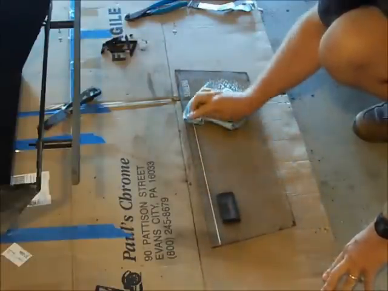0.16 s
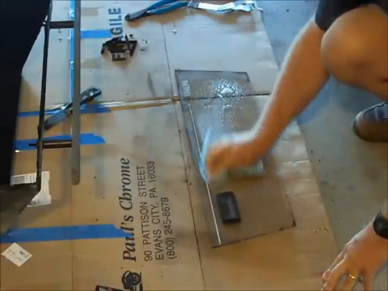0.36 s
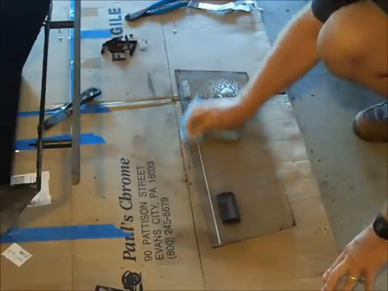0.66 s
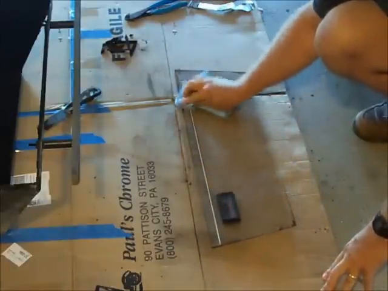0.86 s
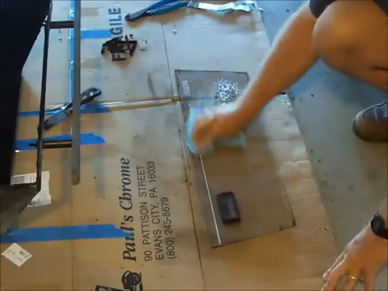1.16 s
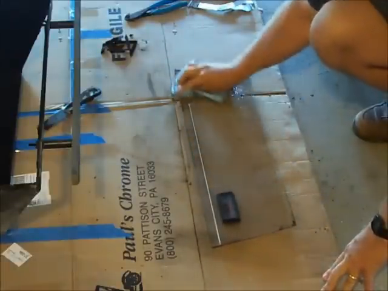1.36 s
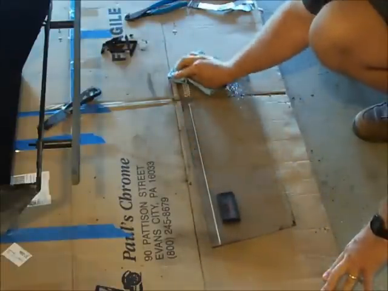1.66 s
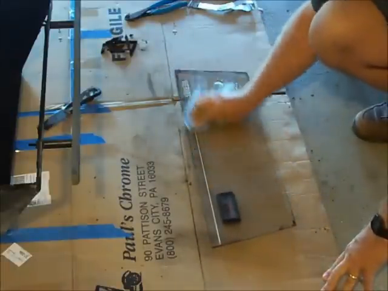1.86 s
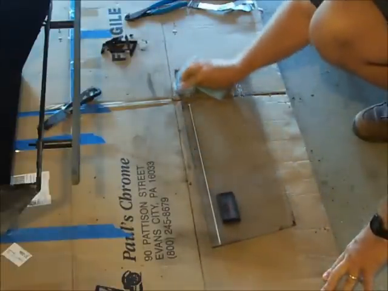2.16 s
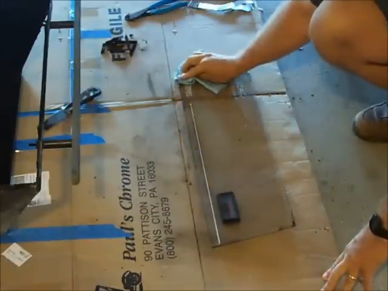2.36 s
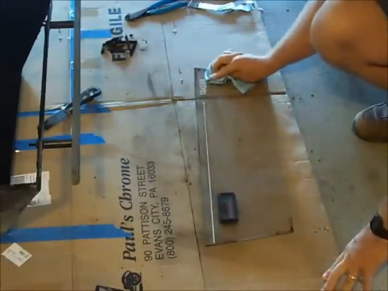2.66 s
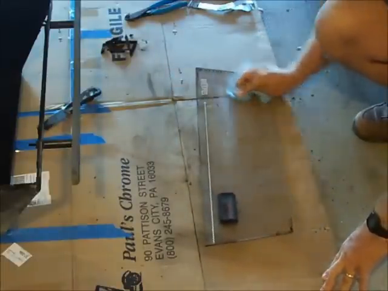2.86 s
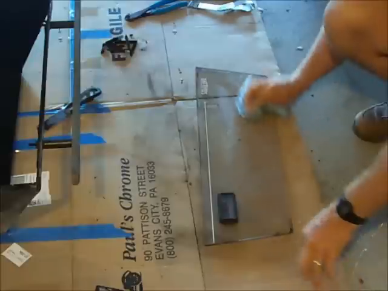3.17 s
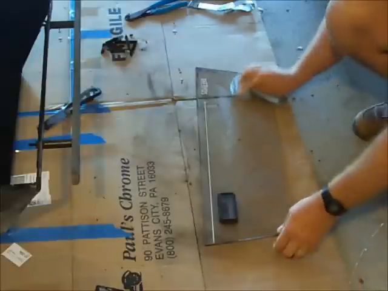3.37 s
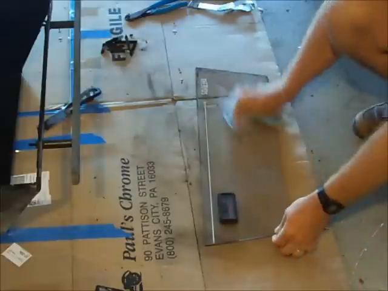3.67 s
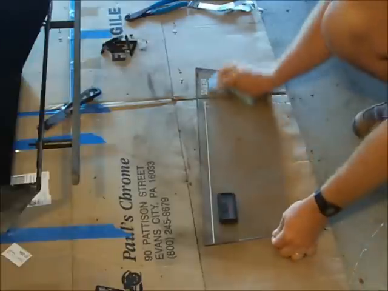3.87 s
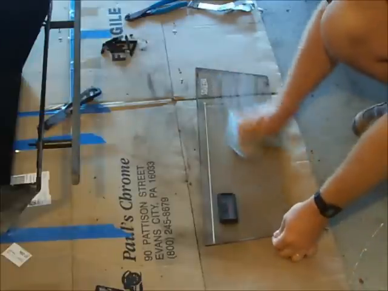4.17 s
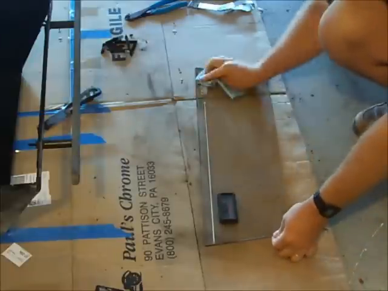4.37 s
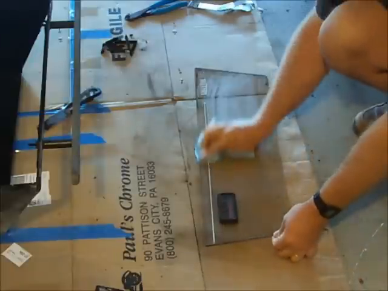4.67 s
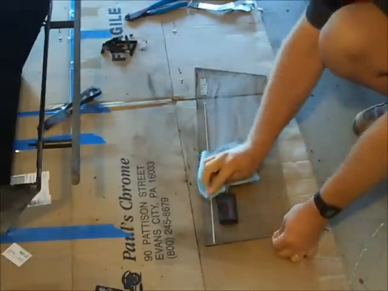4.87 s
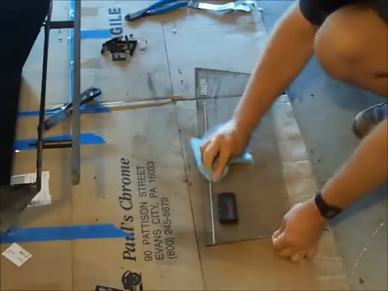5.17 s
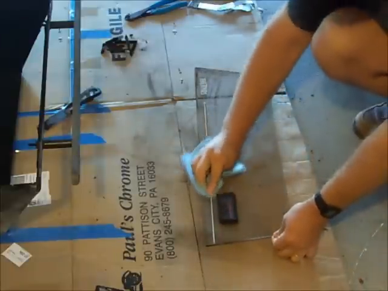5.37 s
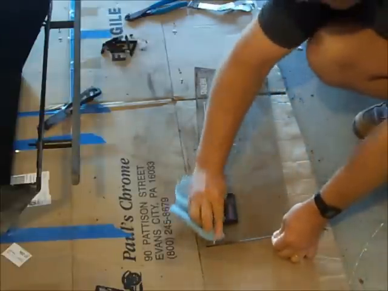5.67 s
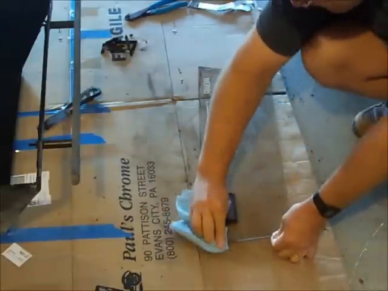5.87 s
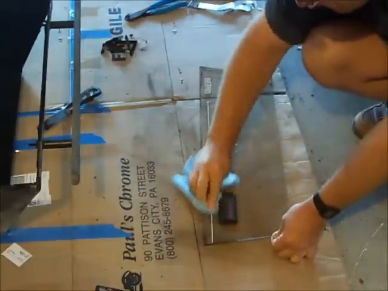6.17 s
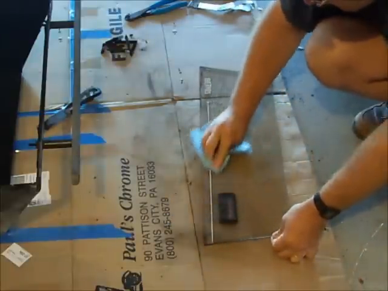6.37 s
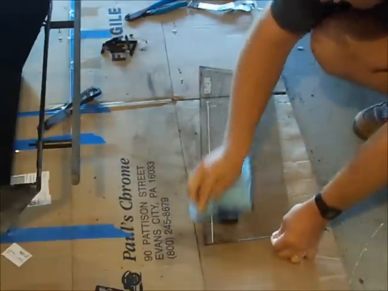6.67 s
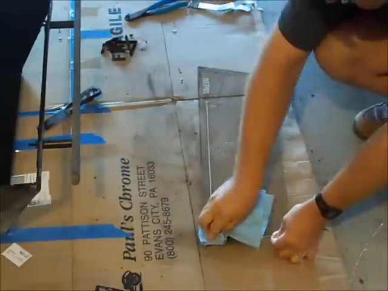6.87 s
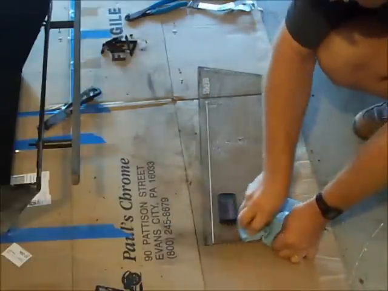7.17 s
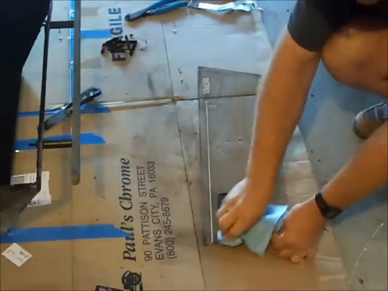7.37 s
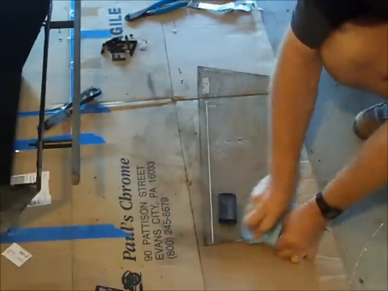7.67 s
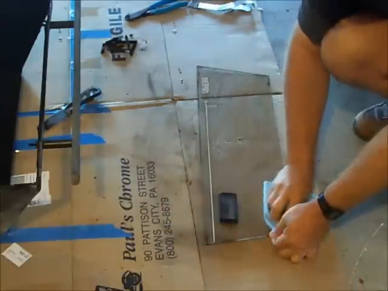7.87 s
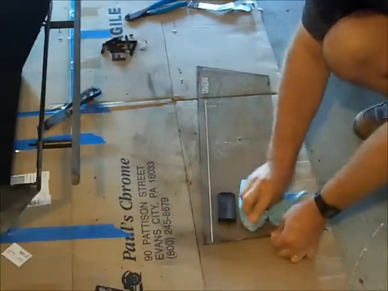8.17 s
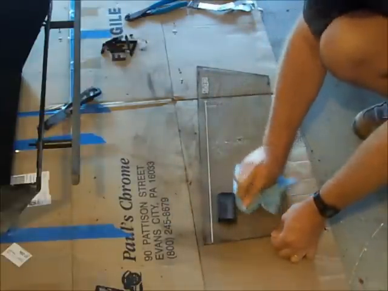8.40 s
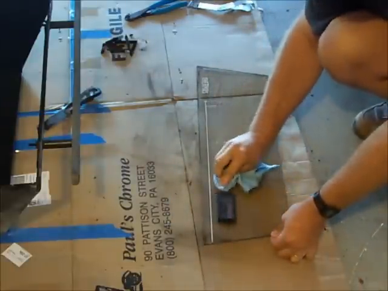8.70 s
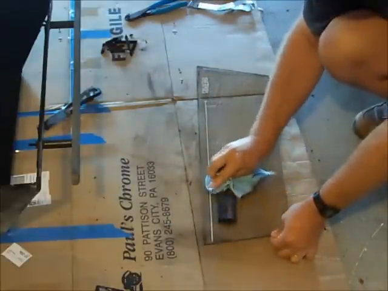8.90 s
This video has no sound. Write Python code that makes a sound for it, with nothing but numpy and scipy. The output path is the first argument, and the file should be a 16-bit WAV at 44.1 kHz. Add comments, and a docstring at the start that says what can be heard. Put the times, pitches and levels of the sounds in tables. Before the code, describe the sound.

A cloth rubs a glass panel in short uneven strokes while the panel knocks on the floor, over faint hum in a hard garage.

```python
"""From the start a low hum and a far engine drone under the air of a garage: tones and filtered noise.
At once a cloth wipes a glass panel on cardboard in short uneven strokes: noise shaped by hand speed.
The panel soon rocks and knocks, late on with one sharp ringing clack: noise bursts, ring and echo.
Past halfway, drier patches squeak (narrow noise bands) and shifting weight swells dully (low noise).
The hard room answers wipes, knocks and squeaks with dense, decaying noise."""
import sys
import numpy as np
from scipy import signal
from scipy.fft import rfft, irfft, next_fast_len
from scipy.io import wavfile
from scipy.ndimage import uniform_filter1d

SR = 44100
rng = np.random.default_rng(int(sys.argv[2]) if len(sys.argv) > 2 else 0)


def master(y):
    """Save y as 16-bit WAV."""
    cut = np.clip(np.atleast_2d(y).T, -1, 1)
    pcm = np.round(cut * 32767)  # scale
    wavfile.write(sys.argv[1], SR, pcm.astype(np.int16))


N = 398663
TIME = np.arange(N) / SR

# Balance of the garage air: f/Hz, relative level per Hz/dB
AIR_SPECTRUM = [(12, 3), (22, -12), (38, -8), (62, -16), (85, -9), (115, -15), (160, -18), (300, -20.5),
                (765, -28), (1290, -30.5), (1830, -41), (3500, -23.5), (4730, -33.5), (6710, -35.5),
                (7230, -42.5), (7790, -60.5), (9000, -66)]
# Level of the hum's main tone: t/s, level/dB
HUM_CURVE = [(0, -67), (4.8, -67), (5.2, -60), (6, -67), (6.6, -68), (6.9, -62), (7.45, -60), (7.65, -52),
             (7.9, -49), (8.2, -50), (8.5, -51), (8.7, -60), (9.04, -55)]
# A far engine pulls, then drops back: t/s, firing rate f/Hz, level/dB before a 1 dB lift
ENGINE_CURVE = [(0, 109, -58), (.3, 103, -60), (1.7, 105, -60), (2.8, 109, -60), (3.8, 115, -61),
                (4.6, 117, -62), (4.95, 98, -67), (6.5, 97, -65), (7.4, 97.5, -63), (7.85, 96.5, -55),
                (8.3, 96, -61), (9.04, 95, -70)]
# Reverberation of the garage: f/Hz, time to fall 60 dB/s
GARAGE_DECAY = [(300, 0.94), (1000, 0.93), (2800, 0.88), (5000, 0.78), (7500, 0.77)]
# Strokes of the cloth: start t/s, speeding up/s, slowing down/s, friction level/dB,
# dark rustle against friction/dB, fine hiss against friction/dB
WIPE_STROKES = [(0.0, 0.0045, 0.11, -55.5, -13, -15), (0.19, .04, .12, -68, -21, -5),
                (0.62, 0.036, .08, -58, -15, -7.5), (0.78, 0.16, 0.082, -50.5, -15, -8.5),
                (1.05, 0.11, 0.12, -49, -16.5, -10), (1.4, 0.078, 0.42, -52.5, -14.5, -12),
                (1.79, 0.14, 0.16, -48, -11, -10.5), (2.26, .1, 0.11, -58, -11, -11),
                (2.48, 0.049, 0.12, -53, -2, -15), (2.51, 0.093, 0.3, -49, -9, -14),
                (2.879, 0.033, 0.65, -55.5, -10.5, -13), (3.17, .11, 0.24, -55.5, -5, -9),
                (3.439, 0.14, 0.16, -49, -3.5, -11.5), (3.83, .1, 0.15, -58, -6.5, -13),
                (4.23, 0.026, 0.081, -57.5, -3, -15), (4.58, 0.17, 0.56, -52, -19.5, -10.5),
                (5.0, .03, 0.083, -53, -13, -12), (5.152, 0.018, 0.095, -44.5, -12.5, -14.5),
                (5.33, 0.13, 0.18, -60.5, -16, -8), (5.513, 0.03, 0.48, -42.5, -17.5, -11.5),
                (5.94, 0.11, 0.33, -52.5, -7.5, -14), (6.159, .14, 0.3, -42, -15, -13.5),
                (6.37, 0.084, 0.23, -48.5, -7.5, -18), (6.89, 0.078, 0.087, -53, -6.5, -16.5),
                (7.05, 0.067, 0.16, -55, -15, -12), (7.16, 0.077, 0.6, -55.5, -6, -13),
                (7.69, 0.04, 0.72, -49.5, -7.5, -14), (8.05, 0.095, 0.23, -51.5, -7, -17),
                (8.355, 0.027, 0.066, -54, -8.5, -11), (8.458, 0.019, 0.1, -47, -13.5, -8.5),
                (8.55, .058, .1, -42.5, -13.5, -11), (8.69, 0.1, 0.13, -48.5, -9, -10)]
# The cloth creeps on between strokes: friction, dark rustle, fine hiss level/dB
CREEP_LEVELS = (-66.5, -69.5, -76.5)
# Balance of cloth on glass: f/Hz, relative level per Hz/dB
CLOTH_SPECTRUM = [(200, -32), (400, -19), (800, -17), (1300, -14), (1800, -13.5), (2400, -9), (3000, -5),
                  (3500, -2), (3950, -4.5), (4500, -8), (5300, -10), (6000, -13), (6800, -15), (7400, -23),
                  (7800, -42)]
# Knocks of the panel: t/s, overall level/dB, treble tilt/dB and bass tilt/dB (-19 is neutral),
# contact pitch f/Hz, hollow panel note f/Hz, trim of the room tail/dB
PANEL_KNOCKS = [(0.337, -22.5, -29.5, -18, 3170, 1610, -10.5), (0.576, -42.5, -7, -28, 2510, 1280, -18),
                (0.991, -29.5, -23, -19.5, 2400, 1620, -3), (2.124, -38, -16, -25, 3100, 1600, -3),
                (3.444, -32.5, -22, -10, 1180, 870, -7), (3.459, -26, -27, -11, 2430, 1280, -3.5),
                (3.963, -24.5, -23, -19, 2400, 1580, -7), (4.499, -27, -20.5, -17.5, 3080, 1280, -5.5),
                (5.021, -44, -14, -14, 3300, 1280, 2.5), (6.016, -27.5, -16, -15, 3700, 1600, -13.5),
                (7.385, -36.5, -31, -23, 2910, 1600, -0.5), (7.454, -11.5, -15.5, -18.5, 2320, 1210, -4),
                (7.983, -38, -40, -12, 3300, 1280, 4), (8.067, -27, -16, -17, 2390, 1170, 0)]
# Basic balance of a knock: f/Hz, relative level per Hz/dB
KNOCK_SPECTRUM = [(150, -35), (300, -22), (500, -23.5), (750, -14), (1150, -9), (1700, -8.5), (2400, -7),
                  (3100, -5), (3900, -4.5), (4800, -13.5), (5400, -11), (6500, -15), (7300, -16),
                  (7800, -45.5)]
# Clusters of panel modes: f/Hz, width/Hz, relative level/dB
GLASS_MODES = [(485, 50, -13), (660, 50, -13), (872, 40, -9), (1135, 50, -7), (1285, 80, -4),
               (1600, 90, -7), (1975, 110, -4), (2250, 80, -3), (2385, 90, -2), (2468, 70, -4),
               (3150, 110, -4), (3500, 100, -6), (3920, 110, -6), (4460, 80, -8), (5060, 60, -12),
               (5185, 60, -10), (5420, 100, -5)]
# The cloth grips and chatters: t/s, length/s, level/dB, pitch f/Hz, whistle width/Hz,
# broad rasp against the whistle/dB
CLOTH_SQUEAKS = [(5.157, 0.074, -46.7, 5630, 200, -3), (7.203, 0.17, -60.5, 5570, 150, -2),
                 (8.054, 0.034, -47, 5330, 70, -6), (8.366, 0.045, -62.5, 5500, 100, -12),
                 (8.602, 0.087, -50.5, 5320, 70, -9), (8.742, 0.14, -51, 5470, 65, -20)]
# Resonances stirred by a squeak: f/Hz, width/Hz, level against the whistle/dB
SQUEAK_RESONANCES = [(1250, 100, -23.5), (3480, 160, -11), (5260, 100, -3), (5830, 120, -8.5),
                     (6000, 100, -9)]
# Dull swells as weight shifts on the cardboard: t/s, length/s, deep rumble level/dB, low rustle level/dB
WEIGHT_SHIFTS = [(5.62, 0.59, -55, -62.5), (7.498, 0.68, -50.5, -58), (8.383, 0.3, -46, -59.5)]


def gain_of(db):
    """Turns decibels into amplitude."""
    return 10 ** (np.asarray(db) / 20)


def evened(x):
    """Scales a sound to rms 1."""
    return x / np.sqrt(np.mean(x ** 2) + 1e-20)


def read(points, hz):
    """Reads a table on a log-frequency axis."""
    f, value = np.transpose(points)
    return np.interp(np.log(hz + 1), np.log(f + 1), value)


def follow(rows):
    """Draws the columns of a time curve at every sample, smoothed over 10 ms."""
    t, *columns = np.transpose(rows)
    return [uniform_filter1d(np.interp(TIME, t, column), size=SR // 100) for column in columns]


def add(mix, t, sound):
    """Mixes a sound in at time t, in seconds."""
    part = mix[max(round(t * SR), 0):][:len(sound)]
    part += sound[:len(part)]


def shaped(x, gain):
    """Filters a sound by a gain that is a function of Hz."""
    size = next_fast_len(len(x))
    spectrum = rfft(x, size)
    return irfft(spectrum * gain(np.fft.rfftfreq(size, 1 / SR)), size)[:len(x)]


def noise(gain, count=N):
    """White noise coloured by a gain that is a function of Hz, rms 1."""
    return evened(shaped(rng.standard_normal(count), gain))


def band(hz, width_hz, count=N):
    """Noise in a single resonance with steep skirts, rms 1."""
    return noise(lambda f: 1 / (1 + (2 * (f - hz) / width_hz) ** 2), count)


def drift(rate_hz, count=N):
    """Slow chance movement up to a given rate, rms 1."""
    return noise(lambda f: 1 / (1 + (f / rate_hz) ** 4), count)


def humming():
    """A wavering tone near 60 Hz, dull noisy overtones that follow it, and a steady boom of the room."""
    level_db, = follow(HUM_CURVE)
    tone = evened(np.sin(2 * np.pi * 60.3 * TIME + 0.7 * drift(2.5)))
    overtones = evened(band(178, 13) + band(220, 200))
    boom = gain_of(-59) * band(62, 13)
    return gain_of(level_db) * (tone + gain_of(-14) * overtones) + boom


def engine():
    """A far engine through the walls: an unsteady sine at its firing rate and a narrow murmur."""
    firing_hz, level_db = follow(ENGINE_CURVE)
    tone = np.sin(2 * np.pi * np.cumsum(firing_hz) / SR)
    unsteadiness = 1 + 0.061 * drift(4.4)
    drone = tone * unsteadiness + 0.41 * band(111.7, 13)
    return gain_of(level_db + 1) * evened(drone)


def background():
    """The air of the garage as steady coloured noise, with the hum and the far engine."""
    air = noise(lambda f: gain_of(read(AIR_SPECTRUM, f)))
    return gain_of(-54) * air + humming() + engine()


def tail(count=SR):
    """Dense reflections of the garage, each band dying at its own speed; energy 1."""
    hz, t, bins = signal.stft(rng.standard_normal(count), SR, nperseg=256)
    decay = gain_of(-60 * t / read(GARAGE_DECAY, hz)[:, None])
    x = signal.istft(bins * decay, SR, nperseg=256)[1][:count]
    return x / np.linalg.norm(x)


def in_room(x, wet_db):
    """Direct sound plus its reflections, kept at about the same power."""
    wet = gain_of(wet_db)
    reflections = signal.oaconvolve(x, tail())[:N]
    return (x + wet * reflections) / np.hypot(1, wet)


def stroking():
    """Hand speed rises and falls in each stroke; returns friction, rustle and hiss amplitudes."""
    speed_up, slow_down = 1.22, 2.32  # steepness of the two flanks
    growths = (1, 0.78, 1.23)  # powers of speed: the rustle lingers, the hiss needs a fast slide
    power = gain_of(CREEP_LEVELS)[:, None] ** 2 * np.ones(N)
    for start, rise_s, fall_s, friction_db, rustle_db, hiss_db in WIPE_STROKES:
        t = np.arange(0, rise_s + fall_s, 1 / SR)
        swing = np.sin(np.pi / 2 * np.interp(t, [0, rise_s, rise_s + fall_s], [0, 1, 0]))
        speed = swing ** np.where(t < rise_s, speed_up, slow_down)
        for layer, layer_db, growth in zip(power, (0, rustle_db, hiss_db), growths):
            amplitude = gain_of(friction_db + layer_db) * speed ** growth
            add(layer, start, amplitude ** 2)  # overlapping strokes add as power
    return np.sqrt(power)


def wiping():
    """Fibres slip and snag on the glass; pressure adds a dark rustle and speed a fine hiss."""
    snags_per_s, snag_db = 900, -6
    body_hz, fine_hz = 2100, 5700
    friction, rustle, hiss = stroking()
    snags = rng.uniform(-1.2, 1, N) * (rng.random(N) < snags_per_s / SR)
    contact = rng.standard_normal(N) + gain_of(snag_db) * evened(snags)
    fibres = shaped(contact, lambda f: gain_of(read(CLOTH_SPECTRUM, f)))
    body = shaped(fibres, lambda f: 1 / (1 + (f / body_hz) ** 6))
    fine = shaped(fibres, lambda f: 1 - 1 / (1 + (f / fine_hz) ** 12))
    middle = fibres - body - fine
    rub = friction * evened(middle) + rustle * evened(body) + hiss * evened(fine)
    uneven_grip = gain_of(0.83 * drift(25))
    return in_room(rub * uneven_grip, wet_db=-5.5)


def knock(level_db, treble_db, bass_db, contact_hz, hollow_hz, tail_db):
    """The glass edge chatters on the floor for a few ms; the panel rings and the room answers."""
    chatter_s, ring_t60_s = 0.0059, 0.56
    crack_db, room_db, ring_db = -10, -17, -21.5
    neutral_db = -19
    t = np.arange(SR) / SR
    # where the edge lands sets how bright and hollow the knock is, and which modes it favours
    tilt = [(700, bass_db - neutral_db), (1500, 0), (3800, 0.014), (5300, treble_db - neutral_db)]

    def colour(f):
        """The knock's basic balance with its own bass and treble tilt."""
        return gain_of(read(KNOCK_SPECTRUM, f) + read(tilt, f))

    def focus(f):
        """A 7 dB lift around the contact pitch and the hollow note."""
        lifts = [np.exp(-(12 * (f / hz - 1)) ** 2) for hz in (contact_hz, hollow_hz)]
        return gain_of(7 * sum(lifts))

    def mode_power(f):
        """Power of the panel's mode clusters, tilted like the knock."""
        power = 0
        for hz, width_hz, mode_db in GLASS_MODES:
            resonance = 1 / (1 + (2 * (f - hz) / width_hz) ** 2) ** 2
            power = power + gain_of(mode_db + read(tilt, hz)) ** 2 / width_hz * resonance
        return power

    crack = noise(lambda f: colour(f) * focus(f), SR)
    crack *= np.exp(-(t / chatter_s) ** 2) * (1 - np.exp(-t / 0.0008))

    echo = shaped(tail(), lambda f: colour(f) / (1 + (f / 6400) ** 10))  # reflections lose the top
    echo /= np.std(echo[:SR // 50])
    echo *= (1 - np.exp(-t / 0.003)) * (1 + 0.5 * np.exp(-t / 0.02))  # floor and near walls answer first

    # noise in narrow clusters flutters as close modes do when they beat
    ring = noise(lambda f: np.sqrt(mode_power(f) * focus(f)), SR)
    ring *= gain_of(-60 * t / ring_t60_s) * (1 - np.exp(-t / 0.003))

    blow = gain_of(crack_db) * crack + gain_of(room_db + tail_db) * echo + gain_of(ring_db) * ring
    return gain_of(level_db) * blow


def knocking():
    """The panel rocks under the hand and strikes the floor at each listed time."""
    out = np.zeros(N)
    for t, *blow in PANEL_KNOCKS:
        add(out, t, knock(*blow))
    return out


def squeaking():
    """Brief stick and slip on dry glass: a rough whistle and a rasp with a few resonances."""
    out = np.zeros(N)
    for t, length_s, level_db, pitch_hz, whistle_width_hz, rasp_db in CLOTH_SQUEAKS:
        whistle = band(pitch_hz, whistle_width_hz, SR)
        rasp = gain_of(rasp_db) * band(5200, 1000, SR)
        ring = sum(gain_of(mode_db) * band(hz, width_hz, SR) for hz, width_hz, mode_db in SQUEAK_RESONANCES)
        chatter = whistle + rasp + ring
        grip = signal.windows.tukey(round(length_s * SR), 0.5)
        add(out, t, gain_of(level_db) * grip * evened(chatter[:len(grip)]))
    return in_room(out, wet_db=-6)


def shifting():
    """Weight moves on the cardboard: a deep swell of noise with a soft, low rustle."""
    out = np.zeros(N)
    for t, length_s, rumble_db, rustle_db in WEIGHT_SHIFTS:
        swell = signal.windows.hann(round(length_s * SR))
        rumble = evened(band(32.7, 13)[:len(swell)])
        rustle = evened((band(145, 59) + band(310, 360))[:len(swell)])
        add(out, t, swell * (gain_of(rumble_db) * rumble + gain_of(rustle_db) * rustle))
    return out


def scene():
    """All layers at one microphone, the same in both channels."""
    mono = background() + wiping() + knocking() + squeaking() + shifting()
    return np.array([mono, mono])


def record(dry):
    """The narrow band of a small camera: a steep low-pass at 7850 Hz."""
    lowpass = signal.firwin(511, 7850, window=("kaiser", 7), fs=SR)
    return signal.oaconvolve(dry, lowpass[None], "same", axes=1)


dry = scene()
out = record(dry)
master(out)
```